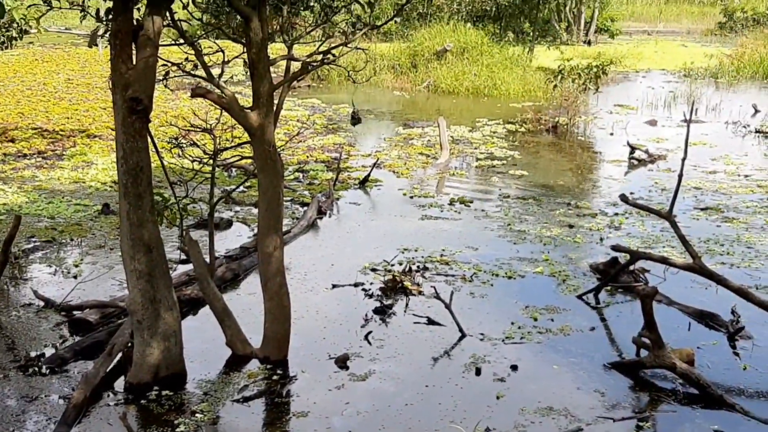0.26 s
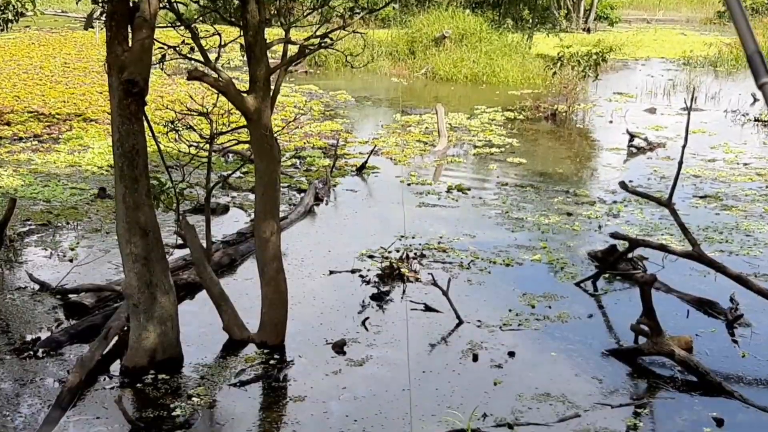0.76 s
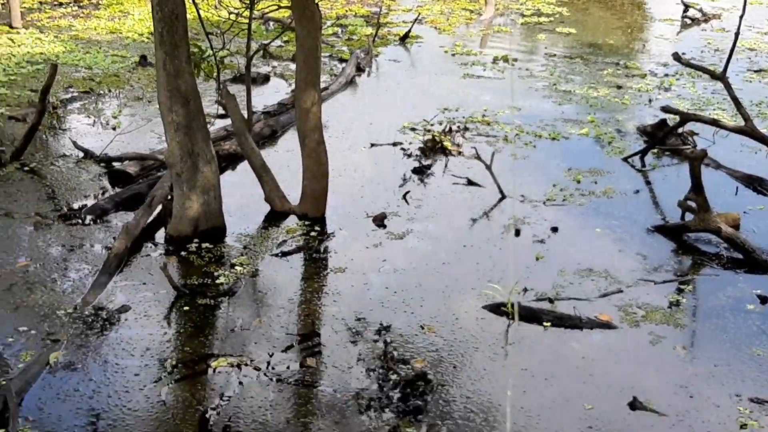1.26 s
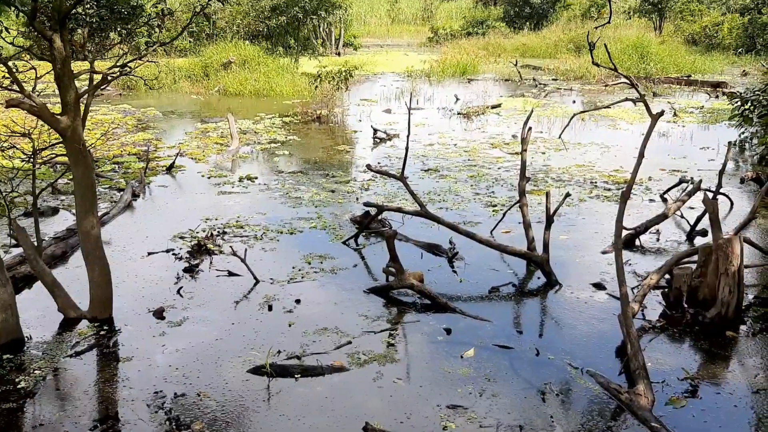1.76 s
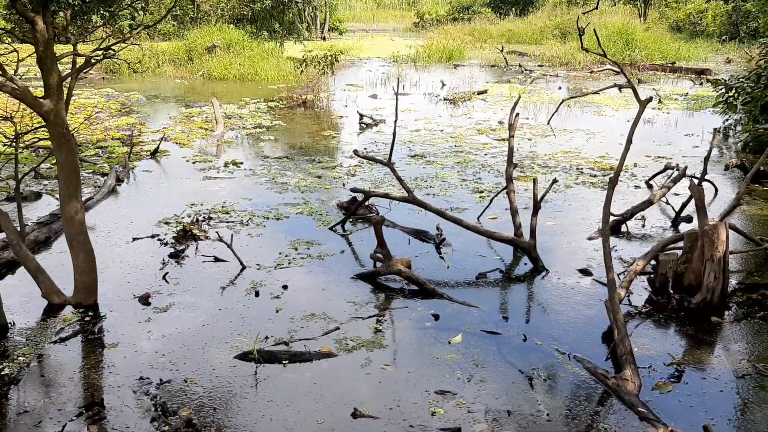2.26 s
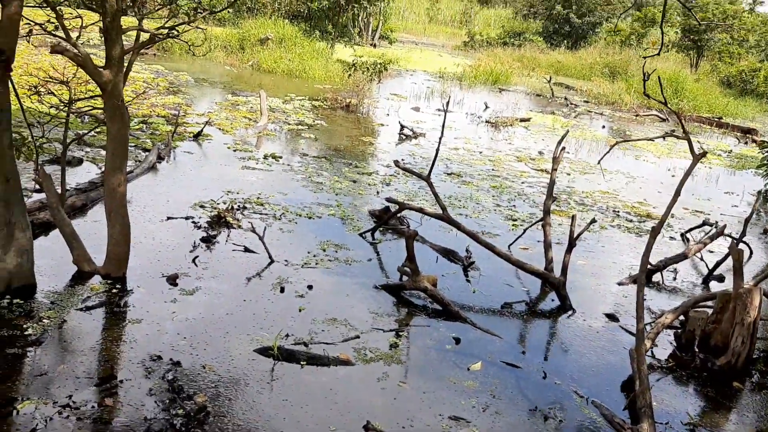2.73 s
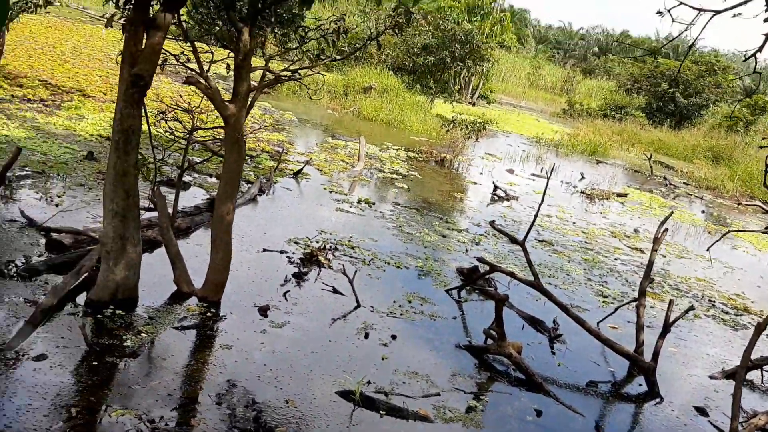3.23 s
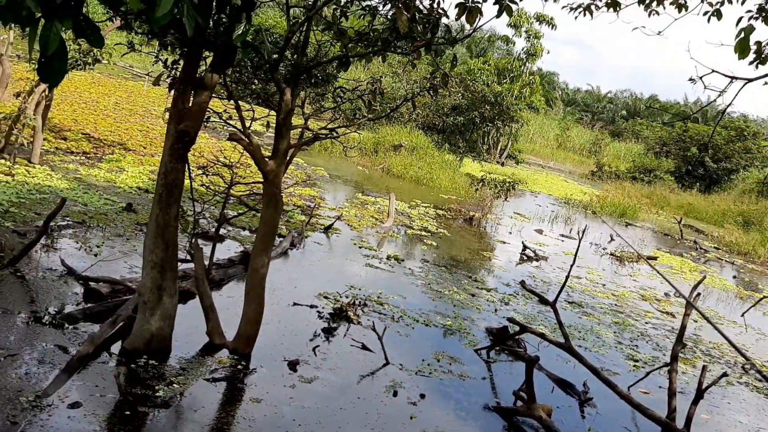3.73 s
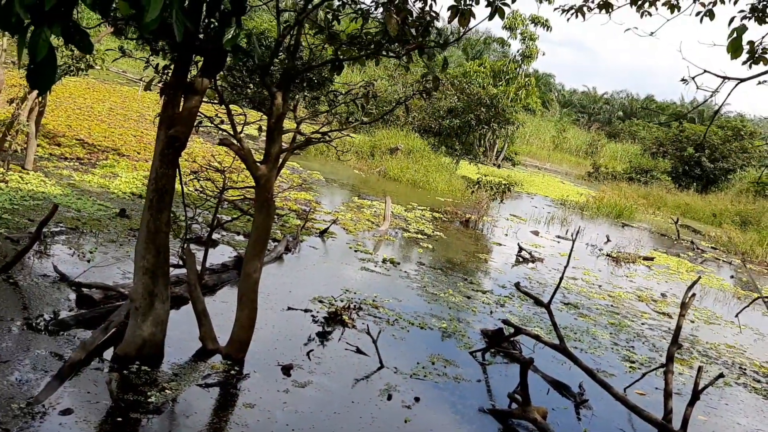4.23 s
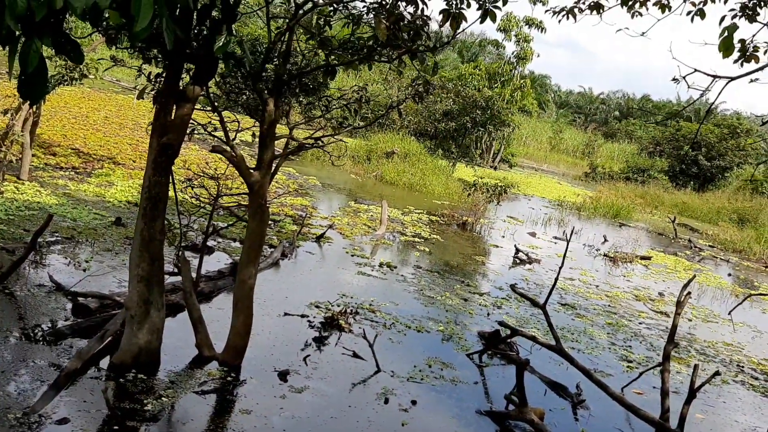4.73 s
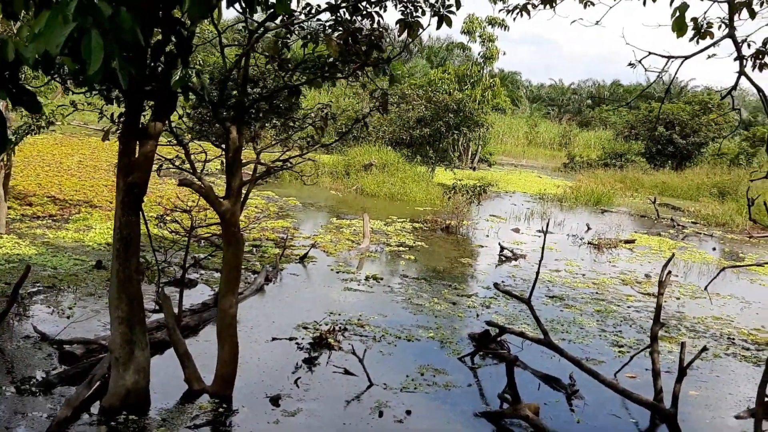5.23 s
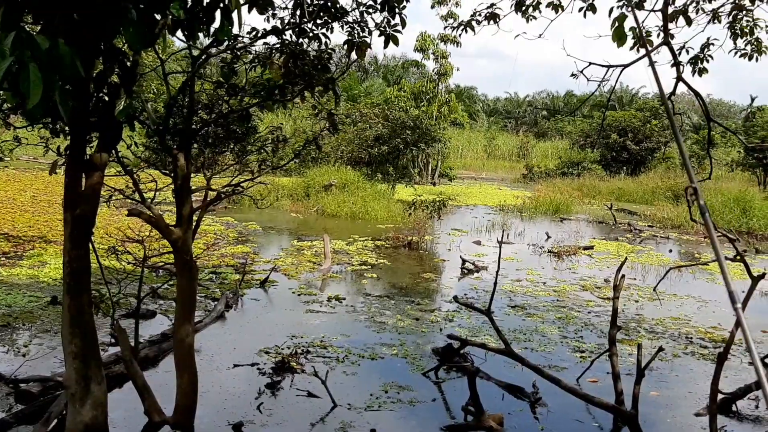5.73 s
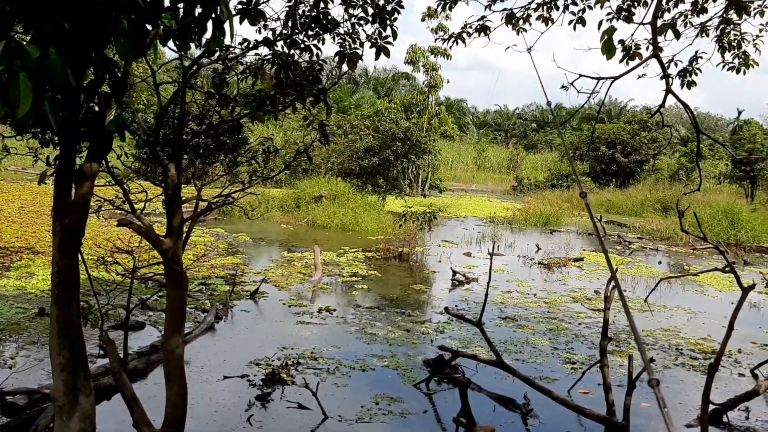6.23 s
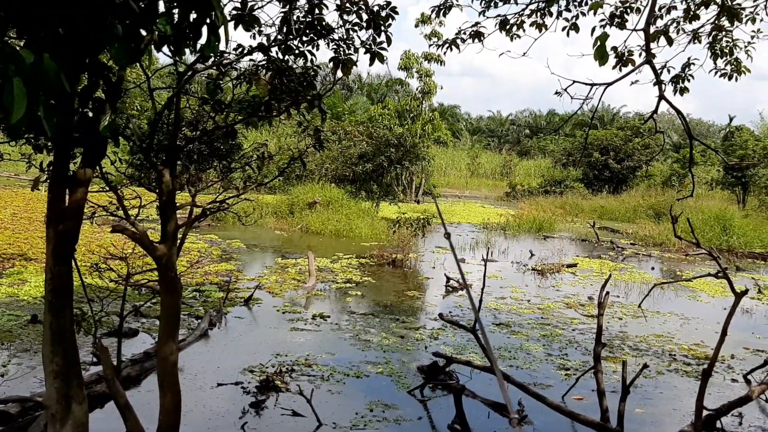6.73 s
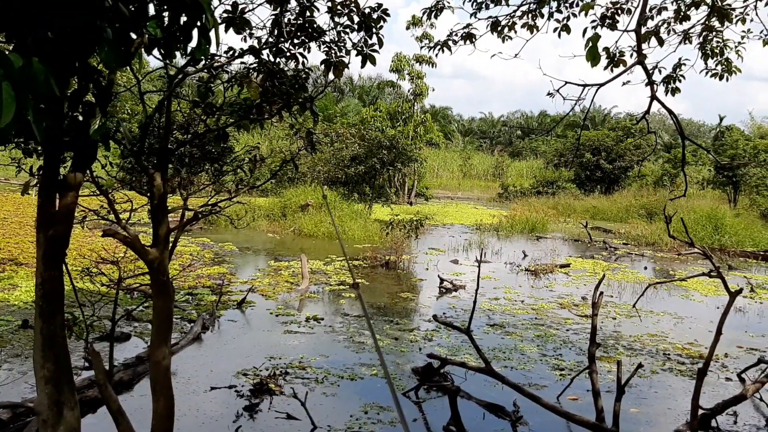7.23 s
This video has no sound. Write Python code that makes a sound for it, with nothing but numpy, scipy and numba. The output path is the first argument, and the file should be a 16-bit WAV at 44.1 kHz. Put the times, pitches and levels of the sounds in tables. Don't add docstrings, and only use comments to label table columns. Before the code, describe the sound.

A close handheld stereo phone hears a fishing cast by a swamp. Quiet katydids throb, leaves hiss and a distant engine putters. A loud, dry clutch clack precedes a short rising swish and a bright, gritty spool whir that winds down. Four quick hoarse bird rasps overlap its end, with cloth rustles, small ticks and low wind bumps. A cluster of metal clacks re-engages the reel, leaving the swamp ambience.

```python
import sys
import numpy as np
from scipy import signal
from scipy.fft import rfft, irfft
from scipy.io import wavfile
from scipy.ndimage import uniform_filter1d
from numba import njit

SR = 44100
rng = np.random.default_rng(int(sys.argv[2]) if len(sys.argv) > 2 else 0)


def elevation(decibels):
    levels = np.asarray(decibels, float)
    return 10 ** (levels / 20)


def put_to_file(sound):
    columns = np.atleast_2d(sound).T
    safe = np.clip(columns, -1, 1)
    whole_steps = np.round(safe * 32767)
    wavfile.write(sys.argv[1], SR, whole_steps.astype(np.int16))


N = 329768
T = np.arange(N) / SR

# start_s, turns_per_s, line_level_db
SPOOL_SPEED = [
    (3.3, 210, -62),
    (3.38, 205, -55.5),
    (3.41, 215, -36),
    (3.5, 246, -32.5),
    (3.65, 254, -37.5),
    (3.95, 166, -43),
    (4.3, 130, -50),
    (4.76, 98, -52),
    (4.95, 94, -68),
]
# start_s, swish_hz, level_db
ROD_TIP = [
    (3.05, 1498, -80.5),
    (3.26, 1500, -64),
    (3.33, 1610, -61.5),
    (3.38, 2110, -40.5),
    (3.46, 2900, -37.5),
    (3.5, 3760, -47),
    (3.56, 4470, -53),
    (3.66, 4460, -51),
]
# start_s, whoosh_hz, level_db
ROD_BUTT = [
    (3.3, 1100, -76),
    (3.37, 1010, -79),
    (3.42, 750, -51),
    (3.47, 600, -55),
    (3.55, 600, -64.5),
    (3.7, 700, -72),
]
# pitch_hz, width_hz, level_db
FRAME_RINGS = [(1490, 110, -0.5), (2050, 510, 3), (2800, 980, 8), (3600, 390, -1), (4610, 1100, -19)]
# pitch_hz, level_db (per Hz)
LINE_HISS = [(3000, -28.5), (5000, -2.5), (6500, -1), (8000, -8), (10200, -3.5), (14900, -3.5), (16000, 0),
             (16200, -34)]
# start_s, peak_db, ring_hz, ring_db, burst_ms
CLUTCH_CLACKS = [(2.872, -29.5, 8000, -9, 1.0), (2.8767, -5, 8000, -13, 2.8),
                 (2.8787, -2.5, 10860, 1.5, .33), (2.879, -28, 854, 21, 12),
                 (2.883, -14.5, 3200, -6.5, 1.2), (2.8848, -17, 1670, -8, .54),
                 (5.6585, -15, 4800, -12, 1.3), (5.664, -24.5, 10790, -3.5, 1.02),
                 (5.677, -10.5, 7740, 0, .3), (5.678, -13.5, 1750, 7.5, 1.5),
                 (5.6847, -5.5, 11430, -1, 1.5), (5.6863, -4, 11620, -6.5, .4),
                 (5.6926, -22.5, 3220, 2, 1.1), (5.7045, -10, 5990, -0.5, .45),
                 (5.7066, -7.5, 8610, 7.5, .98), (5.71, -24.5, 8160, 0.5, .9)]
# pitch_hz, level_db (per Hz)
CHATTER = [(300, -50.5), (700, -30), (1600, -8), (3000, -0.5), (8000, -2), (12000, -1.5), (15500, -5),
           (16500, -31)]
# start_s, peak_db, pitch_hz, burst_ms
SMALL_TICKS = [(1.609, -51, 767, 1.38), (1.892, -52, 1526, 1.3), (1.918, -46.5, 1290, 1.4),
               (1.939, -46, 2720, .43), (2.01, -49.5, 1540, 1.3), (3.254, -45, 1560, 1.3),
               (3.306, -24.5, 3720, 0.72), (3.342, -31.5, 2100, 11.4), (3.4, -25, 2080, 3.8),
               (3.466, -31, 3670, 1.5), (3.476, -23, 3460, 2.7), (3.563, -27, 3506, 1.2),
               (4.958, -38.5, 690, 1.1), (4.961, -47, 1030, 0.98), (5.029, -40.5, 864, 2.8),
               (5.032, -39.5, 2050, 1.2), (5.097, -48.5, 2132, 1.1), (5.163, -58, 2063, 1.44),
               (5.33, -40.5, 1560, 2), (5.349, -41.5, 1676, 1.32), (5.584, -40.5, 1695, 2.75),
               (5.593, -37.5, 1579, 2.8), (5.602, -38.5, 1520, 2.85), (6.409, -45, 4044, 1.2),
               (6.434, -47, 2158, 2.4), (6.526, -52.5, 2610, 1.4)]
# start_s, length_s, from_hz, to_hz, level_db
LINE_SINGS = [
    (2.98, 0.2, 2750, 2900, -65),
    (3.15, 0.174, 3200, 3620, -55),
    (3.06, 0.34, 1330, 1640, -50.5),
    (1.84, 0.26, 1400, 1490, -60.5),
]
# start_s, length_s, pitch_hz, width_hz, level_db
SLEEVE_RUSTLES = [
    (1.87, 0.21, 2750, 2300, -58.5),
    (4.6, 0.14, 1600, 1200, -48.5),
    (5.025, 0.11, 2230, 930, -55),
    (4.952, 0.17, 12700, 12000, -51.5),
    (13, .07, 1800, 1270, -56),
    (6.405, 0.16, 3300, 3700, -67),
    (4.4, 0.18, 2800, 3000, -55),
]
# start_s, level_db, rise_s, length_s
BIRD_RASPS = [
    (4.158, -31.5, 0.019, .052),
    (4.2965, -30.5, .004, 0.044),
    (4.4335, -30.5, .0032, 0.04),
    (4.576, -30, 0.0027, 0.043),
]
# pitch_hz, width_hz, level_db
BEAK_RINGS = [(2120, 200, -15), (3000, 300, -7), (3400, 480, 0), (3850, 420, -6)]
# start_s, peak_db, pitch_hz, fade_60db_s
BIRD_CLUCKS = [
    (1.8098, -51, 1490, 0.033),
    (1.8347, -50.5, 1490, 0.038),
    (1.8931, -58, 1460, 0.062),
    (2.397, -49, 1690, 0.027),
    (2.4419, -35.5, 1870, 0.016),
]
# start_s, length_s, from_hz, to_hz, level_db
FAR_WHISTLES = [
    (.68, .46, 4500, 4120, -80),
    (6.24, .2, 2800, 2800, -86),
    (6.5, .24, 2850, 2900, -87),
]
# start_s, firings_per_s
ENGINE_SPEED = [(0, 26), (.45, 28.4), (.68, 23.6), (1.9, 29.6), (3.04, 28), (3.2, 32.2), (3.42, 23.6),
                (3.8, 24.7), (4.05, 29.4), (4.35, 25.7), (4.85, 30), (5.62, 31.3), (6.14, 29.1),
                (6.33, 31.3), (6.6, 21.2), (6.9, 26.8), (7.22, 22.6), (7.48, 27.5)]
# peak_s, half_length_s, level_db
THROTTLE = [(.4, 0.22, -60), (0.952, 0.28, -66.5), (1.92, 0.12, -51), (2.303, 0.1, -58.5),
            (2.9, 0.27, -58.5), (3.157, 0.14, -49.5), (3.57, 0.25, -56.5), (3.94, 0.15, -48.5),
            (4.45, 0.16, -58.5), (4.747, 0.24, -43.5), (5.196, 0.39, -42), (5.62, 0.243, -42.5),
            (5.976, 0.32, -55), (6.301, 0.17, -50), (6.828, .22, -57.5), (7.48, .2, -55.5)]
# multiple (of the firing rate), level_db
EXHAUST_TONE = [(1, -22.5), (2, -17.5), (3, -10.5), (4, -7.5), (5, 1), (6, 2.5), (7, -24), (8, -25.5),
                (9, -18.5), (10, -28), (11, -18), (12, -26), (13, -29.5)]
# first_s, last_s, period_s, level_db
KATYDID_BOUTS = [
    (.15, .75, .178, -55),
    (1.52, 1.65, .09, -60),
    (1.91, 3.4, .1775, -55.5),
    (4.225, 4.45, .16, -52),
    (4.598, 5.65, .163, -56.5),
    (5.922, 7.45, .184, -56),
]
# pitch_hz, level_db (per Hz)
KATYDID_WING = [(4710, -58.5), (8000, -27), (9060, -32.5), (10600, -12.5), (14900, -4), (15700, -5),
                (16100, -17), (16200, -46)]
# pitch_hz, level_db (per Hz)
FAR_DRONE = [(60, -12.5), (90, 0.5), (180, -5), (230, -10.5), (500, -18.5), (900, -22), (1500, -28)]
# pitch_hz, level_db (per Hz)
LEAF_RUSTLE = [(500, -9), (900, -11), (1600, 5), (3000, 0.5), (5000, -2.5), (8000, -11.5), (11000, -8)]
# peak_s, half_length_s, level_db
WIND_GUSTS = [
    (.46, .08, -66),
    (.75, .08, -65),
    (4.603, 0.16, -52.5),
    (4.779, 0.072, -38.5),
    (4.985, 0.071, -45),
    (5.29, .09, -45.5),
    (6.402, 0.16, -63),
    (6.932, 0.11, -58),
]
# start_s, gain_db
BACKGROUND_GAIN = [(0, 0.5), (1.5, 0), (1.75, -3.5), (2.0, -1), (3.2, 0), (4.6, 0), (5.65, 0), (5.85, -7.5),
                   (7.48, -5)]


def level(x, db=0):
    return x * elevation(db) / np.sqrt(np.mean(x ** 2))


def track(table, off=None):
    s, *columns = np.transpose(table)
    return [np.interp(T, s, c, off, off) for c in columns]


def swell(at, half):
    return np.cos(np.pi / 2 * np.clip((T - at) / half, -1, 1)) ** 2


def phrase(at, length, top):
    return np.interp(T, [at, at + top * length, at + length], [0, 1, 0])


def noise():
    return rng.standard_normal(N)


def colour(x, spectrum):
    hz, db = np.transpose(spectrum)
    f = np.arange(x.shape[-1] // 2 + 1) * SR / x.shape[-1] + 1
    gain = elevation(np.interp(np.log(f), np.log(hz), db, -90, -90))
    return irfft(rfft(x) * gain, x.shape[-1])


@njit
def svf(x, hz, width):
    y, b, l = np.empty(len(x)), 0., 0.
    for i in range(len(x)):
        g, k = np.tan(np.pi * hz[i] / SR), width / hz[i]
        v = (b + g * (x[i] - l)) / (1 + g * (g + k))
        b, l, y[i] = 2 * v - b, l + 2 * g * v, k * v
    return y


def band(x, hz, width):
    return svf(x, hz * np.ones(len(x)), 1. * width)


def band_twice(x, hz, width):
    return band(band(x, hz, width), hz, width)


def walk(rate):
    k = int(SR / rate)
    steps = np.repeat(rng.standard_normal(N // k + 1), k)
    return 1.5 * uniform_filter1d(uniform_filter1d(steps, k), k)[:N]


def place(x, lag, pan_db=0.):
    return np.array([np.roll(x, int(round(lag))) * elevation(pan_db / 2), x * elevation(-pan_db / 2)])


def scatter(x, t60, db):
    s = np.arange(int(.5 * SR)) / SR
    echo = rng.standard_normal((2, len(s))) * elevation(-60 * s / t60) * np.minimum(s / .004, 1)
    echo /= np.sqrt(np.sum(echo ** 2, axis=1, keepdims=True))
    return elevation(db) * signal.fftconvolve(x * np.ones((2, 1)), echo, axes=1)[:, :N]


def high_pass(x, order, hz):
    return signal.sosfilt(signal.butter(order, hz, "high", fs=SR, output="sos"), x)


def add(out, s, x):
    i = int(s * SR)
    out[..., i:i + x.shape[-1]] += x[..., :N - i]


def burst(ms):
    t_ms = np.arange(2048) / SR * 1000
    return rng.standard_normal(2048) * np.minimum(t_ms / 0.093, 1) * np.exp(-t_ms / ms)


def cast():
    turns_hz, line_db = track(SPOOL_SPEED)[0], track(SPOOL_SPEED, off=-120)[1]
    swish_hz, swish_db = track(ROD_TIP)[0], track(ROD_TIP, off=-120)[1]
    butt_hz, butt_db = track(ROD_BUTT)[0], track(ROD_BUTT, off=-120)[1]
    beat = 1 + .25 * np.cos(2 * np.pi * np.cumsum(turns_hz) / SR)
    grit = elevation(2.5 * rng.exponential(size=N)) * noise() * beat
    frame = np.zeros(N)
    for hz, width, db in FRAME_RINGS:
        ring = band(grit, hz * (1 + 0.018 * walk(9.5)), width)
        frame += elevation(db) * level(ring) * elevation(2.1 * walk(25))
    frame = level(high_pass(frame, 4, 1200))
    frame *= elevation(line_db - 6.5) + elevation(swish_db - 1.5)
    line = level(colour(noise() * beat * elevation(1.56 * walk(80)), LINE_HISS)) * elevation(line_db)
    tip = level(band(noise(), swish_hz, 1800)) * elevation(1.5 * walk(60)) * elevation(swish_db)
    butt = level(band_twice(noise(), butt_hz, 800)) * elevation(1.4 * walk(40)) * elevation(butt_db)
    whir = frame + line + tip + butt
    return place(whir, 10, -2.0) + scatter(whir, .15, -4.5)


def clacks(lead, lag):
    out, strikes = np.zeros((2, N)), np.zeros(N)
    sides = np.resize([1, -1], len(CLUTCH_CLACKS))
    for side, (s, db, hz, ring_db, ms) in zip(sides, CLUTCH_CLACKS):
        push = burst(ms)
        hit = level(colour(push, CHATTER) * lead) + level(band_twice(push, hz, 900), ring_db)
        hit *= elevation(db + 1.44) / np.abs(hit).max()
        add(out, s, place(hit, lag + rng.integers(-1, 2), -0.2 + 5 * side))
        strikes[int(s * SR)] += elevation(db - ring_db / 2) * np.sqrt(ms)
    return high_pass(out, 3, 620), strikes


def ticks(lead, lag):
    out = np.zeros((2, N))
    for s, db, hz, ms in SMALL_TICKS:
        push = burst(ms)
        hit = band_twice(push, hz, 1.1 * hz) + .3 * colour(push, CHATTER) * lead
        hit *= elevation(db + 4.0) / np.abs(hit).max()
        add(out, s, place(hit, lag + rng.integers(-2, 3), 5))
    return out


def rubs():
    out = np.zeros(N)
    for s, length, *glide, db in LINE_SINGS:
        hz = np.interp(T, [s, s + length], glide)
        out += level(band_twice(noise(), hz, 210), db) * phrase(s, length, 0.73) ** 2
    for s, length, hz, width, db in SLEEVE_RUSTLES:
        out += level(band_twice(noise(), hz, width), db) * phrase(s, length, 0.19)
    return place(out, 9.2)


def handling():
    lead = np.arange(2048) < 1024
    lag = 4
    hits, strikes = clacks(lead, lag)
    dry_sound = hits + ticks(lead, lag) + rubs()
    return dry_sound + scatter(colour(strikes, CHATTER), 0.27, -1.5)


def rasping_bird():
    pulses = np.diff(np.floor(np.cumsum(310 * (1 + 0.15 * walk(150))) / SR), prepend=0)
    voice = level(pulses * elevation(2 * walk(200))) + .7 * noise()
    moments = [s + d for s, _, _, length in BIRD_RASPS for d in (.01, length)]
    throat_hz = np.interp(T, moments, [1690, 1454] * len(BIRD_RASPS))
    effort = np.zeros(N)
    for s, db, rise, length in BIRD_RASPS:
        times = [0, rise, .6 * length + .3 * rise, length, length + .025]
        effort += elevation(db) * np.interp(T - s, times, [0, .75, 1, .5, 0])
    throat = level(band(band_twice(voice, throat_hz, 420), throat_hz, 420), -2)
    throat *= effort ** 1.3 / effort.max() ** .3
    beak = np.zeros(N)
    for hz, width, db in BEAK_RINGS:
        ring = band(band(band(voice, hz, 1.36 * width), hz, 1.47 * width), hz, 1.84 * width)
        beak += elevation(db) * level(ring)
    beak = level(beak, -1.9) * effort
    return place(throat + beak, 17.8, -5.5) + scatter(beak, 0.34, -4.5) + scatter(throat, 0.24, -11.5)


def far_calls():
    calls, s = np.zeros(N), np.arange(int(.2 * SR)) / SR
    for at, db, hz, t60 in BIRD_CLUCKS:
        fade = elevation(db + 7.0 - 60 * s / t60) * np.minimum(s / 0.0016, 1)
        add(calls, at, fade * np.sin(2 * np.pi * hz * s * (1 + 1.5 * s)))
    for at, length, *glide, db in FAR_WHISTLES:
        hz = np.interp(T, [at, at + length], glide) * (1 + .004 * walk(60))
        loudness = elevation(db + 14.0 + 1.2 * walk(30)) * np.sqrt(phrase(at, length, .45))
        calls += loudness * np.sin(2 * np.pi * np.cumsum(hz) / SR)
    return place(calls, 3) + scatter(calls, .35, -6)


def engine():
    load = elevation(-67) + sum(elevation(db) * swell(s, 1.2 * half) for s, half, db in THROTTLE)
    hz = uniform_filter1d(track(ENGINE_SPEED)[0], size=3000)
    turns = np.cumsum(hz * (1 + .003 * walk(25))) / SR
    multiple, multiple_db = np.transpose(EXHAUST_TONE)
    tone = np.zeros(N)
    for k in range(1, 16):
        db = np.interp(k * hz, multiple * 30.7, multiple_db, -30, -50) + 2.0 * walk(9)
        tone += elevation(db) * np.sin(2 * np.pi * k * turns + 0.104 * k * k)
    tone /= np.sqrt(uniform_filter1d(tone ** 2, size=8820))
    rumble = level(band_twice(noise(), 140, 130), -15.5)
    return place((tone + rumble) * load, 9, 3.2)


def katydid():
    strokes, s = np.zeros(N), np.arange(int(.2 * SR)) / SR
    shape = (s / 0.055) ** 4.1 * np.exp(3.93 * (1 - s / 0.061)) * np.clip((.2 - s) / .05, 0, 1)
    for first, last, period, db in KATYDID_BOUTS:
        for at in np.arange(first, last, period):
            add(strokes, at - .065, elevation(db + .8 * rng.standard_normal()) * shape)
    teeth = elevation(1.2 * walk(60) + 2.5 * walk(500))
    song = level(band(colour(noise() * teeth, KATYDID_WING), 14300, 6600), .6) * strokes
    return place(song, 3, 2.5) + scatter(song, .12, -6)


def swamp():
    mid, left, right = rng.standard_normal((3, N))
    drone = level(colour(np.array([0.9 * left, right]) + 0.53 * mid, FAR_DRONE), 5.88)
    drone *= elevation(-63 + 0.87 * walk(3.71))
    leaves = level(colour(rng.standard_normal((2, N)), LEAF_RUSTLE), 4) * elevation(-69 + .8 * walk(12))
    chorus = level(colour(rng.standard_normal((2, N)), KATYDID_WING)) * elevation(-57 + 1.1 * walk(21))
    gusts = elevation(-72.5 + 4.3 * walk(5))
    gusts += sum(elevation(db) * swell(s, 1.15 * half) for s, half, db in WIND_GUSTS)
    wind = np.array([level(band_twice(noise(), 50, 40), db) for db in (4, -5)])
    return drone + leaves + chorus + wind * gusts


def scene():
    background = (katydid() + swamp()) * elevation(track(BACKGROUND_GAIN)[0])
    return cast() + handling() + rasping_bird() + far_calls() + engine() + background


def band_limit(x):
    return signal.sosfilt(signal.butter(12, 15830, fs=SR, output="sos"), x)


def record(dry):
    mix = np.clip(dry, -1, 1)
    return band_limit(mix)


dry = scene()
out = record(dry)
put_to_file(out)
```